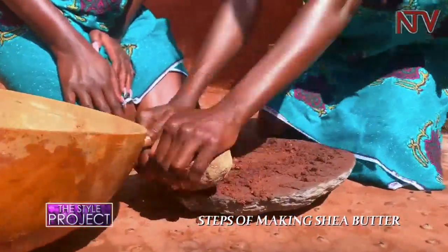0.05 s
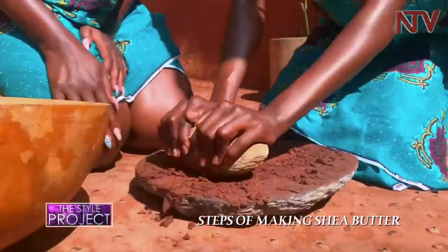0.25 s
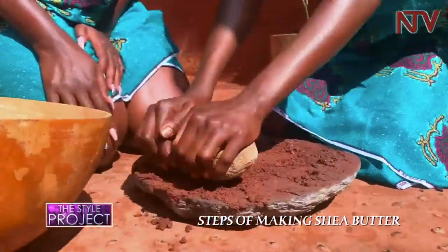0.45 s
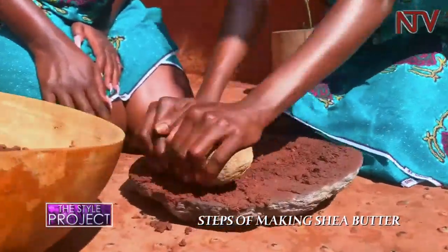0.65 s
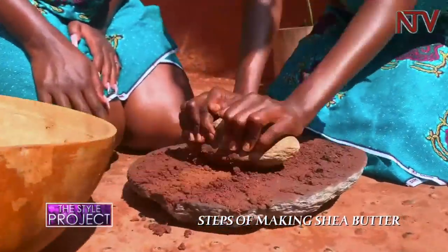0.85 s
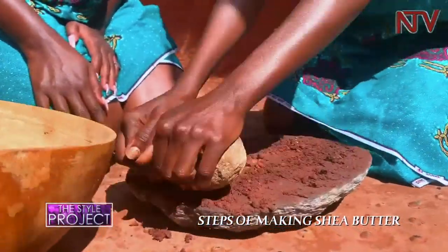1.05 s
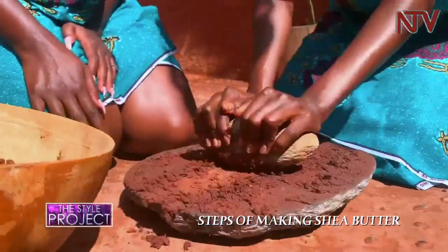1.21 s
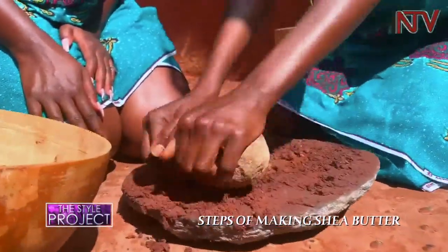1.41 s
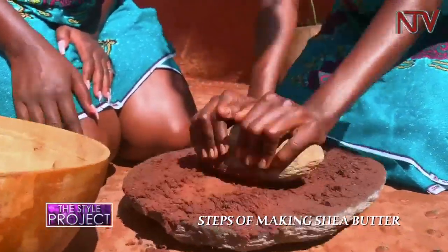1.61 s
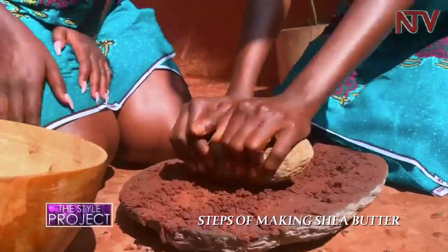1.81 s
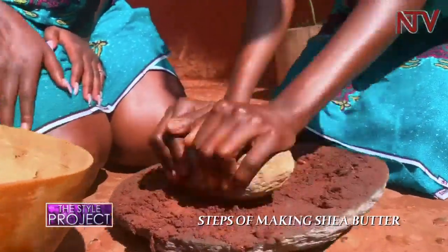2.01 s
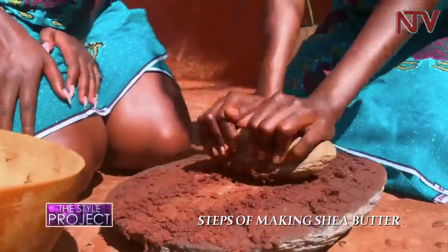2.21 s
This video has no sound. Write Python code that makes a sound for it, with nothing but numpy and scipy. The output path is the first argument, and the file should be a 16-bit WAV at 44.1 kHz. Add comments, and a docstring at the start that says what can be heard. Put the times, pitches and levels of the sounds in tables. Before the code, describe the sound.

A hand stone scrapes and knocks on a flat stone slab, crushing gritty roasted nuts outdoors

```python
"""On bare ground a hand stone is pushed to and fro over a flat slab, crushing roasted nuts, heard close by.
The meal is dense clicks heard as a hiss that follows the strokes; snaps are made of short noise bursts.
Where stone meets stone the slab rasps, from many tiny slips; when the stone rocks it knocks, ringing the slab
and sending a thud of falling pitch through the ground. Loud knocks overload the recorder.
Behind it all lies the steady, slightly flickering noise of the open air."""
import sys
import numpy as np
from scipy import signal
from scipy.fft import rfft, irfft
from scipy.io import wavfile

SR = 44100
rng = np.random.default_rng(int(sys.argv[2]) if len(sys.argv) > 2 else 0)


def store_pcm(level_fs):
    """Save levels as 16-bit WAV."""
    pcm = np.round(np.clip(level_fs, -1, 1) * 32767).astype(np.int16)
    wavfile.write(sys.argv[1], SR, np.atleast_2d(pcm).T)


def boost(x):
    """Linear amplitude factor 10**(x/20) for a level x in decibels (scalar or array-like)."""
    u = np.asarray(x, float) / 20
    return 10 ** u


N = 99710


def rms_one(x):
    """Scale to rms 1."""
    return x / np.sqrt(np.mean(x ** 2) + 1e-20)


def bandpass(x, low_hz, high_hz):
    """Keep only the sound between two pitches."""
    return signal.sosfilt(signal.butter(2, [low_hz, high_hz], "band", fs=SR, output="sos"), x)


def drift(rate_hz):
    """Slow random wander of spread 1: smoothed noise, drawn once every 40 samples."""
    r = np.exp(-80 * np.pi * rate_hz / SR)
    noise = rng.standard_normal(N // 40 + 2002)
    slow = signal.lfilter([1], [1, -2 * r, r * r], noise)[2000:]  # skip the start-up
    return np.interp(np.arange(N) / 40, np.arange(len(slow)), rms_one(slow))


def grains(per_s, spread_db):
    """Random clicks of uneven size and sign; rms 1."""
    size_draw, sign_draw, when_draw = rng.random((3, N))
    sizes = boost(spread_db * np.minimum(-np.log(size_draw + 1e-9), 4))
    return rms_one(sizes * np.sign(sign_draw - .5) * (when_draw < per_s / SR))


def banded(sources, spectrum, patchy_db):
    """Quarter-octave bands, each with its own level and flicker, from two sources in turn; rms 1."""
    hz, db = np.transpose(spectrum)
    edges = np.geomspace(hz[0], hz[-1], int(4 * np.log2(hz[-1] / hz[0])) + 1)
    out = 0
    for k, (low, high) in enumerate(zip(edges, edges[1:])):
        level_db = np.interp(np.log(low * high) / 2, np.log(hz), db)
        band = bandpass(sources[k % 2], low, high)
        out = out + boost(level_db + patchy_db * drift(34)) * band
    return rms_one(out)


def ring(force, hz, t60):
    """A unit click sets a sine of height 1 ringing; it falls by 60 dB in t60 seconds."""
    r, w = boost(-60 / (t60 * SR)), 2 * np.pi * hz / SR
    return signal.lfilter([0, np.sin(w)], [1, -2 * r * np.cos(w), r * r], force + 1e-18)


def body(modes, at_s, db, tilt_db, mid_hz, steady, lag_cycles):
    """Blows, with new strengths for every mode, and a steady force ring one table of modes."""
    out, spread = np.zeros(N), rng.standard_normal((len(at_s), len(modes)))
    for k, (hz, level_db, t60) in enumerate(modes):
        force = steady.copy()
        tilted_db = db + tilt_db * np.log2(hz / mid_hz)
        force[(at_s * SR).astype(int)] += boost(tilted_db + 4 * spread[:, k])
        lag = int(lag_cycles * SR / hz)  # lower modes arrive later
        out[lag:] += (-1) ** k * boost(level_db) * ring(force, hz, t60)[:N - lag]
    return out


# Spectrum of the outdoor background: (frequency [Hz], relative level [dB per Hz])
AIR_SPECTRUM = [(12, -23), (20, 9), (116, 5.5), (660, -16), (802, -21.5), (1660, -22), (1860, -22),
                (8410, -45.5), (16000, -93)]


def open_air():
    """Outdoor background: noise shaped band by band, with a slight flicker."""
    return boost(-31.5) * banded(rng.standard_normal((2, N)), AIR_SPECTRUM, patchy_db=3.5)


# The stone slides through the meal, near silent at each turn: (time [s], hiss level [dB])
STROKES = [(0, -31), (.03, -41.5), (0.092, -51), (.15, -41), (.2, -37), (.265, -48.5), (.31, -40.5),
           (0.358, -40), (0.423, -55.5), (.5, -39.5), (.56, -38), (.6, -53.5), (0.633, -33.5), (0.699, -40),
           (.75, -60.5), (0.808, -41), (.89, -37.5), (.935, -54), (0.972, -35.5), (1.03, -39),
           (1.086, -54.5), (1.13, -41), (1.22, -33), (1.275, -45.5), (1.31, -39), (1.37, -40.5),
           (1.45, -50.5), (1.5, -41), (1.569, -34.5), (1.608, -48), (1.638, -34.5), (1.72, -39),
           (1.79, -47.5), (1.85, -39), (1.931, -35), (1.96, -50.5), (1.988, -34), (2.07, -33.5),
           (2.14, -45.5), (2.2, -37), (2.26, -32.5)]


def stroke_level():
    """Hiss level of the strokes in dB, joined by straight lines."""
    return np.interp(np.arange(N) / SR, *np.transpose(STROKES))


# The stone rocks and knocks; all levels are relative: (time [s], ring of the slab [dB],
# thud in the ground [dB], tilt of the ring [dB per octave], tilt of the thud [dB per octave])
KNOCK_LIST = [(.008, -37, -17.5, 20, 6), (.014, -13, -11.5, 7, -9), (.052, -23.5, -14.5, -18.5, 22),
              (0.124, -8.5, 0, -1, 4.2), (0.154, -46, -13.5, 0.1, 17), (.198, -35, -25, 5, -8),
              (.271, -25.5, -20, 4, -11), (.321, -11, -16.5, 1.3, -3), (.366, -21.5, -20, -4.5, 3),
              (0.4476, 0.5, 6, -1.5, 6.5), (0.488, -19.5, -10.5, -5, 7), (.628, -14, -7, -10, 3.5),
              (.639, -14.5, -4.5, 1, 8), (.655, -17.5, -20, 4, 21), (.691, -9.5, -15, -2.8, 2),
              (.744, -20.5, -11, -0.5, -8.6), (0.805, -35.5, -17, 13, -1.5), (0.852, -45, -23.5, 0.1, 7),
              (0.956, -31, -15.5, -11, -12), (.987, -10, -17, 0.5, -1), (1.009, -12.5, -35, -1, 3),
              (1.033, -23, -25, 0.1, 13), (1.118, -24.5, -29, 9.9, 17), (1.19, -40, -24.5, 5, 22),
              (1.207, -47, -11.5, 10, -3), (1.293, -21, -11, 5.5, -8), (1.33, -10, -6.5, -10.5, -7.5),
              (1.3514, -12.5, -3, 3.5, -1.5), (1.396, -20.5, -19, -3, 11), (1.527, -35.5, -26.5, 12.8, -15),
              (1.643, -18.5, -11, 3.5, -3.5), (1.707, 2, 3.5, -6.5, -1.5), (1.726, -41, -4.5, -10, 12),
              (1.7489, -10.5, -3.5, -1.5, 2), (1.895, -29.5, -24.5, 14, -8), (2.005, -29, -25.5, 3, -15),
              (2.062, 1.5, 2, -1, 4), (2.076, -4.5, -6, 2, -4), (2.096, -35, -5, 0, -8),
              (2.115, -18.5, -12.5, -8, 14), (2.205, -29.5, -19, -13, -4), (2.227, -21.5, -47, -3, 0.1)]


def knocks():
    """Columns of the knocks: one blow drives both the slab and the ground."""
    return np.transpose(KNOCK_LIST)


# A lighter tock with the same falling pitch, higher: (time [s], level [dB], pitch ratio)
LIGHT_TOCKS = [(0.045, -7.5, 2.32)]


def soil_waves():
    """First wave of each blow through the soil: its pitch falls, as the higher part arrives first."""
    start_hz, end_hz, fall_s, peak_s = 518.5, 139, 0.0048, 0.0032
    delay_s, wave_db = 0.001382, -0.5
    at_s, _, thud_db, _, _ = knocks()
    rows = [(s + delay_s, db + wave_db, 1) for s, db in zip(at_s, thud_db)] + LIGHT_TOCKS
    out, t = np.zeros(N + SR), np.arange(SR // 20) / SR
    cycles = np.cumsum(end_hz + (start_hz - end_hz) * np.exp(-t / fall_s)) / SR
    swell = (t / peak_s * np.exp(1 - t / peak_s)) ** 2
    for (s, db, ratio), turn in zip(rows, rng.random(len(rows))):
        wave = swell * np.sin(2 * np.pi * (cycles * ratio + turn))
        out[int(s * SR):int(s * SR) + len(t)] += boost(db) * wave
    return out[:N]


# Modes of the slab lying on soil: (frequency [Hz], relative level [dB], time to fall 60 dB [s])
GROUND_MODES = [(55.6, -32.5, 0.19), (81.2, -15.5, 0.41), (105.4, -14.5, 0.33), (132.6, -8.5, 0.14),
                (178.2, -6.5, 0.086), (200.5, -14.5, 0.17), (229.6, -15.5, 0.26), (287.3, -18, 0.25),
                (316, -20, 0.12), (371.6, -12.5, 0.067)]


def ground(slide_db):
    """Knocks thud through the soil; the slab judders on it after them and under the stroke."""
    settle_t60_s, settle_db, jolts_per_s = 0.26, -18.5, 200
    crunch_db, crunch_follows = -38.5, 0.21  # nuts crushed under the stroke; dB per dB of stroke
    at_s, _, thud_db, _, tilt_db = knocks()
    blows = np.zeros(N)
    blows[(at_s * SR).astype(int)] = boost(thud_db + settle_db)
    settle = signal.lfilter([1], [1, -boost(-60 / (settle_t60_s * SR))], blows + 1e-18)
    crunch = boost(crunch_db + crunch_follows * (slide_db - slide_db.mean()))
    jolts = (settle + crunch) * grains(jolts_per_s, spread_db=3) * boost(-20)
    modes = body(GROUND_MODES, at_s, thud_db - 5, tilt_db, mid_hz=200, steady=jolts, lag_cycles=.5)
    soil_cut = signal.butter(2, 1310, fs=SR, output="sos")  # low-pass, Hz
    return soil_waves() + signal.sosfilt(soil_cut, modes)


# Spectrum of the meal's hiss: (frequency [Hz], relative level [dB per Hz])
MEAL_SPECTRUM = [(1200, -44), (1800, -44), (2600, 4), (3200, 1), (4000, 6), (5400, 1), (6500, 1.5),
                 (8000, 7.5), (9000, 6), (11000, 5), (12500, 11.5), (14500, -11), (15500, -4),
                 (17500, -16.5)]


def meal(slide_db):
    """Sliding meal: dense grit clicks make a patchy hiss that follows the strokes."""
    grit = [grains(per_s=3700, spread_db=1.5) for _ in range(2)]
    return boost(slide_db) * banded(grit, MEAL_SPECTRUM, patchy_db=2.5)


# Bursts of the snaps; one snap may take several rows, for its low, high and topmost parts:
# (time [s], level [dB], centre frequency [Hz], width [octaves])
SNAP_BURSTS = [(0.021, -26, 3200, 0.87), (.271, -23.5, 2400, 0.98), (.449, -24, 2500, 4.5),
               (0.49, -20, 6050, 3.6), (.627, -9, 2520, .6), (0.808, -26, 3500, 2.5),
               (0.987, -22, 2410, 0.63), (1.291, -15.5, 8800, 2), (1.116, -36, 3500, 1.4),
               (1.395, -26.5, 2660, 0.43), (1.566, -32, 11200, 1.0), (1.626, -17, 12000, 1.5),
               (1.71, -13, 2880, 1.8), (1.71, -16, 10200, 0.6), (2.0639, 6.5, 11000, 1.5),
               (2.0638, -18, 15500, 0.17), (2.065, -1, 4650, 2.7), (2.206, -23, 4170, 0.31)]


def snaps():
    """Snaps are built from short bursts of noise with a fainter tail, each burst in its own band."""
    burst_s, tail_s, tail_db = 0.0004, 0.0043, -7.5
    out, t = np.zeros(N + SR), np.arange(SR // 20) / SR
    shape = np.exp(-(t / burst_s) ** 2) + boost(tail_db) * np.exp(-t / tail_s)
    noises = rng.standard_normal((len(SNAP_BURSTS), len(t)))
    for (s, db, hz, octaves), noise in zip(SNAP_BURSTS, noises):
        low, high = np.clip(hz * 2 ** (np.array([-.5, .5]) * octaves), 50, 16500)
        burst = bandpass(noise * shape, low, high)
        out[int(s * SR):int(s * SR) + len(t)] += boost(db) * burst / np.abs(burst).max()
    return out[:N]


# Bare stone drags on bare stone: (start [s], length [s], relative level [dB], rise time [s])
STONE_RASPS = [(.003, 0.045, -26.5, 0.0013), (0.114, 0.067, -34.5, 0.0095), (0.31, 0.047, -31, 0.0043),
               (0.51, 0.032, -58, .015), (0.628, 0.054, -28, 0.034), (0.847, 0.021, -43, 0.0051),
               (0.946, 0.082, -28, 0.026), (1.107, 0.026, -37, 0.0053), (1.182, .04, -36.5, 0.0043),
               (1.284, 0.08, -30, 0.0067), (1.525, 0.013, -35, 0.012), (1.645, 0.097, -30, 0.0073),
               (1.739, .02, -33, 0.0097), (1.892, 0.017, -60.5, 0.012), (1.981, 0.13, -29.5, 0.024),
               (2.067, 0.042, -67, 0.0029), (2.191, .06, -44.5, 0.0093)]


def stone_slips(slide_db):
    """Dragging stone slips many times a second; the sliding meal adds a faint share."""
    meal_db, fall_s = -30.5, 0.011
    t = np.arange(N) / SR
    drag = boost(slide_db + meal_db + 2.17 * drift(14.7))
    for s, length, db, rise in STONE_RASPS:
        grip = np.clip((t - s) / rise, 0, 1)
        release = np.exp(-np.maximum(t - s - length, 0) / fall_s)
        drag = drag + boost(db - 20) * grip * release
    return drag * grains(per_s=1500, spread_db=3)


# Modes of the slab: (frequency [Hz], relative level [dB], time to fall 60 dB [s])
SLAB_MODES = [(584, -0.5, 0.037), (676.4, -2, 0.061), (934, -14.5, 0.011), (1171, -2.5, 0.032),
              (1543, -9.5, 0.025), (1635, -9.5, .11), (1692.6, -10, 0.093), (2234, -21, 0.025),
              (2622, -25.5, 0.11), (3085, -27.5, 0.043), (3028, -37.5, 0.11), (3500, -33.5, 0.1),
              (4190, -27, 0.053)]


def slab(slide_db):
    """Knocks and dense slips ring the slab; the slips are also heard directly, as a dry grating."""
    at_s, ring_db, _, tilt_db, _ = knocks()
    slips = stone_slips(slide_db)
    grate = boost(30.5) * bandpass(slips, 310, 1200)
    return grate + body(SLAB_MODES, at_s, ring_db - 7, tilt_db, mid_hz=1000, steady=slips, lag_cycles=0)


def scene():
    """Open air, ground, meal, snaps and slab together; strokes and knocks are shared between them."""
    slide_db = stroke_level()
    return (open_air() + ground(slide_db) + meal(slide_db) + snaps() + slab(slide_db))[None]


# Two narrow dips and a bump in the treble: (centre [Hz], width [Hz], level change [dB])
TREBLE_SHAPE = [(9690, 1150, -15), (13230, 1100, -18), (15300, 1200, 5.5)]


def treble_gain(hz):
    """Gain at each frequency: the dips, the bump, and a steep cut at the top."""
    colour_db = 0
    for centre_hz, width_hz, db in TREBLE_SHAPE:
        colour_db = colour_db + db * np.exp(-(2 * (hz - centre_hz) / width_hz) ** 4)
    return boost(colour_db) / np.sqrt(1 + (hz / 15950) ** 160)


def band_limit(x):
    """A steep low-pass at the top of the band."""
    return signal.sosfilt(signal.butter(12, 16950, fs=SR, output="sos"), x)


def record(dry):
    """Shape the treble, then overload: the loudest peaks are smoothly flattened towards 1."""
    hz = np.arange(N // 2 + 1) * SR / N
    heard = irfft(rfft(dry) * treble_gain(hz), N)
    hardness = 5.0
    flat = heard / (3 + np.abs(heard) ** hardness) ** (1 / hardness)  # the 3 also lowers quiet sound a little
    return band_limit(flat)


dry = scene()
out = record(dry)
store_pcm(out)
```